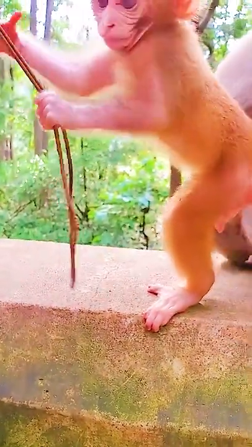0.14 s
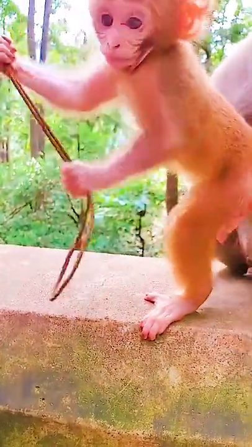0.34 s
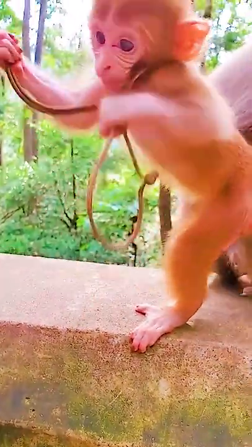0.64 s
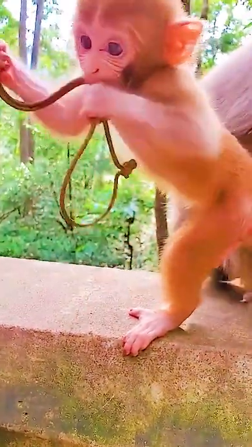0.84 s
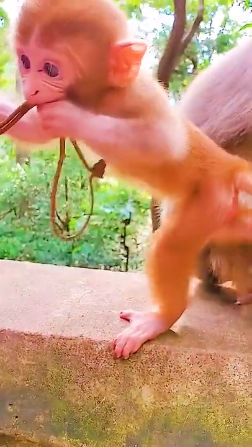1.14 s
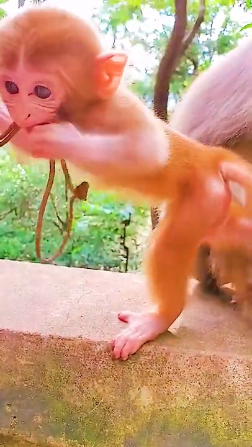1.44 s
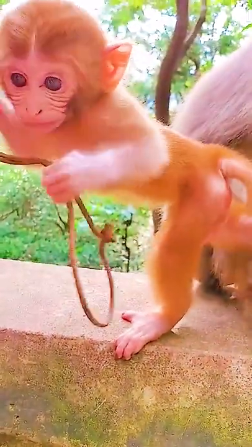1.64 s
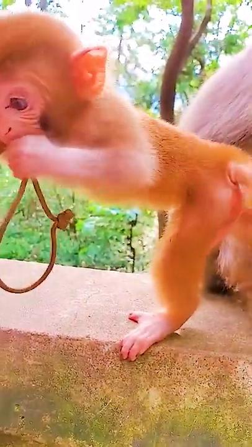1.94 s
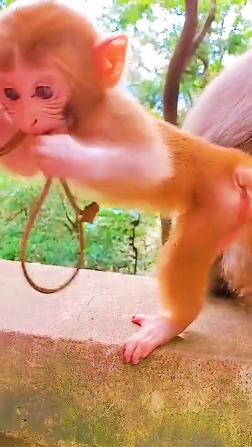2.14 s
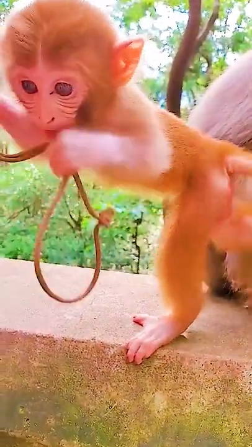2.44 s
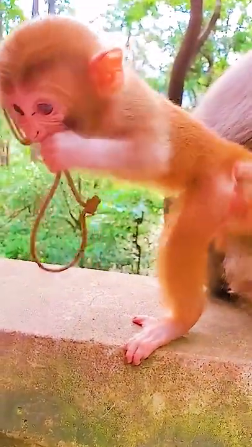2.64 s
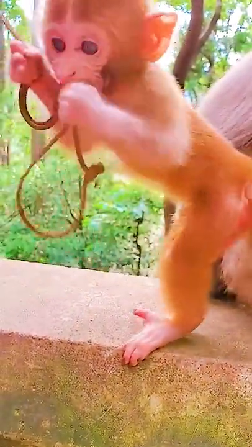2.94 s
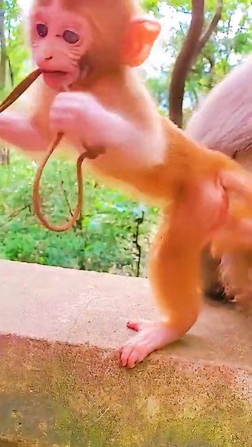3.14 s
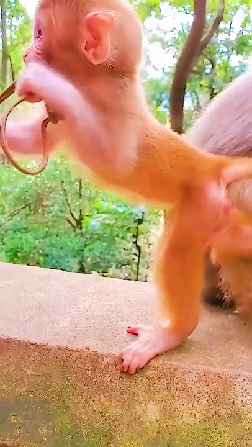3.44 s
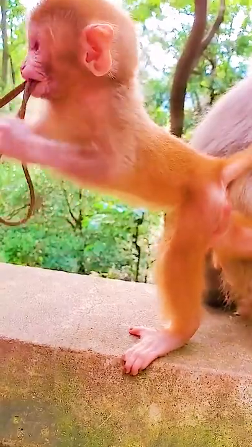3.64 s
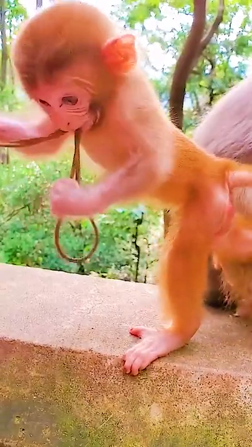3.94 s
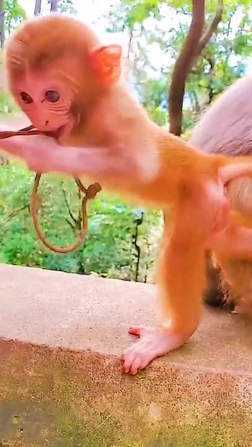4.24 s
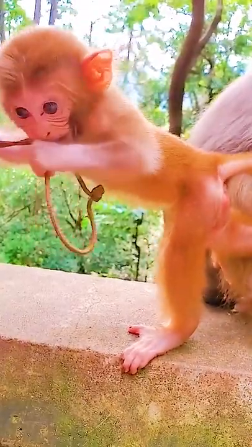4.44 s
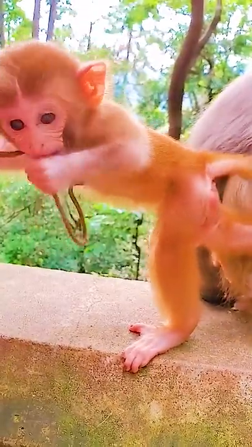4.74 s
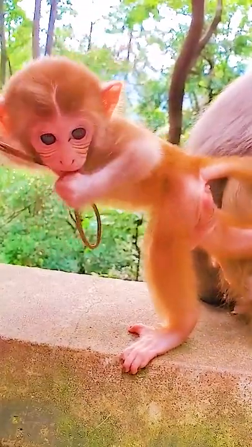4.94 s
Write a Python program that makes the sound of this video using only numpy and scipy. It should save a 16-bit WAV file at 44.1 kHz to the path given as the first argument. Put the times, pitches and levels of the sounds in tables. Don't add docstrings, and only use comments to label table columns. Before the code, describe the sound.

A young monkey shrieks four times in quick piercing bursts close on the left, then gives sparse weaker squeaks and yelps before soft coos outdoors.

```python
import sys
import numpy as np
from scipy import signal
from scipy.fft import rfft, irfft, next_fast_len
from scipy.io import wavfile
from scipy.ndimage import uniform_filter1d

SR = 44100
rng = np.random.default_rng(int(sys.argv[2]) if len(sys.argv) > 2 else 0)


def magnitude_from_level(level_db):
    exponent = np.asarray(level_db, float) / 20
    return 10 ** exponent


def master(y):
    cut = np.clip(np.atleast_2d(y).T, -1, 1)
    pcm = np.round(cut * 32767)
    wavfile.write(sys.argv[1], SR, pcm.astype(np.int16))


N = 223926

# (frequency [Hz], density [dB per Hz])
AIR_SPECTRUM = [(12, -48.5), (30, -8.5), (125, 1.5), (214, -16.5), (670, -26.5), (1150, -21.5), (3380, -28),
                (15600, -46.5)]
# (frequency [Hz], correlation [-1..1])
AIR_LIKENESS = [(25, 1), (150, 0.99), (300, 0.72), (600, 0.0324), (1650, 0.15), (5000, 0.034)]
# (frequency [Hz], level [dB])
AIR_LEAN = [(300, 0), (700, 2.5), (1650, 3.5), (5000, 9), (15000, 4)]
# (start [s], length [s], level [dB])
RUSTLES = [(0.255, 0.16, -42.5), (0.841, 0.00304, -20.5), (1.387, 0.0038, -52.5), (2.628, 0.0046, -40),
           (3.29, .003, -22.5), (1.684, 0.0022, -43.5), (2.07, 0.23, -44), (2.496, 0.008, -50),
           (2.716, 0.063, -51), (3.056, 0.0091, -55.5), (3.193, .07, -50), (3.28, 0.0023, -27.5),
           (3.616, 0.027, -50), (3.923, 0.016, -49), (4.474, .01, -61)]

# (time [s], pitch [Hz], level [dB], treble lift of the open mouth [dB])
SHRIEKS = [
    [(.405, 3700, -14, 5.5), (.41, 3880, -9.5, 8), (.422, 3900, -12, 1.5), (.439, 3575, -8, -6),
     (.445, 3090, -3, -13.5), (.453, 2690, -4.5, -20), (.459, 2530, -36, -20.5)],
    [(.577, 3445, 3, -5.5), (.59, 3956, -5, 3.5), (.62, 3783, -11, 1), (.66, 4020, -13.5, 12.5),
     (.67, 3567, -7, 3.5), (.686, 3464, -8, 6), (.694, 3210, -1, -12), (.702, 2570, -9, -15)],
    [(.845, 4080, -7, 26), (.861, 4367, -7.5, 15), (.872, 4210, -8, 9), (.877, 3403, -7, 13.5),
     (.926, 3261, -7, 15.5), (.944, 2990, 2, -6.5), (.962, 2077, -10.5, -19.5), (.972, 1870, -36, -19)],
    [(1.078, 3335, -32, 14), (1.088, 3420, -16.5, 9.5), (1.092, 3450, -2.5, -6), (1.125, 3304, -1.5, -14),
     (1.153, 3336, -2, -10), (1.159, 3426, -13.5, -9), (1.169, 3440, -19.5, -13), (1.174, 3350, -40, -20)],
]
# (time [s], pitch [Hz], level [dB], treble lift of the open mouth [dB])
YELPS = [
    [(3.084, 2176, -29.5, 0.5), (3.096, 3285, -28, 3.5), (3.108, 3600, -20.5, -14.5),
     (3.113, 3733, -16, -10.5), (3.128, 3570, -14, -7), (3.138, 2623, -21, -12.5),
     (3.148, 2140, -35.5, -37)],
    [(3.2925, 2720, -14.5, 16), (3.304, 3050, -15, 17), (3.32, 3117, -13, -0.5), (3.335, 2870, -14.5, 0.5),
     (3.346, 2795, -14, 0.5), (3.359, 2627, -17, 18), (3.364, 2450, -35.5, 2), (3.378, 2010, -39.5, -8.5)],
]
# (time [s], pitch [Hz], level [dB])
PEEPS = [
    [(.277, 3540, -30), (.287, 3545, -26.5), (.291, 3370, -18.5), (.297, 2890, -26)],
    [(1.771, 3090, -31), (1.788, 3030, -30), (1.792, 2770, -46), (1.8, 2110, -29)],
    [(1.964, 3090, -18), (1.972, 3303, -26), (1.979, 3136, -20), (1.985, 2400, -36.5), (1.994, 1970, -26)],
    [(2.16, 2414, -51.5), (2.175, 2980, -32), (2.187, 2837, -35), (2.197, 2517, -24), (2.213, 2125, -31),
     (2.222, 2010, -50)],
    [(2.43, 1454, -36), (2.437, 1510, -36), (2.444, 1340, -44)],
    [(3.539, 2463, -35), (3.546, 2660, -22.5), (3.556, 2656, -20.5), (3.561, 2153, -21), (3.568, 1696, -34),
     (3.585, 1687, -44)],
    [(3.741, 2000, -18), (3.752, 1916, -14.5), (3.762, 2008, -23), (3.78, 1654, -42)],
]
# (size factor on throat, chest [dB], second [dB], third [dB], top [dB]),
# levels against the main resonance
MOUTHS = [(0.991, -35, -1.5, 1, -7), (1.05, -44, -10, -7.5, -13.5), (0.95, -35, -9, -7.5, -9.5),
          (0.983, -4, -6.5, -3.5, -16.5), (0.96, -23, 3.5, -7, -1.5), (0.99, -43.5, -21, -0.5, -15),
          (1.2, -19, -17, -17, -10), (0.943, -21.5, 0, -3.5, 8.5), (1.013, 2, 2, -1.5, -12),
          (.9, -4, -15, -10.5, -17.5), (0.61, 9, 0, -1, 1), (0.977, 0, 3, -35, -6.5),
          (1.12, 9.5, 16.5, 1, 15.5)]
SHEEN_DB = [-1.5, -2.5, -4.5, -3, 7.5, -0.5, 6, 5.1, 4, 3.5, -3, 3.5, -17.5]
# (centre [Hz], width [Hz], level [dB])
THROAT = [(1800, 470, 1.5), (3350, 1480, 1.5), (5800, 1690, 2.5), (8180, 1520, 0.5), (10570, 2700, 0.5),
          (13300, 4500, -0.5), (13700, 780, -7)]
# (time [s], pitch [Hz], level [dB])
CLUCK = [(2.629, 954, -27.5), (2.637, 843, -29.5), (2.65, 660, -43)]
# (time [s], [(centre [Hz], width [Hz], level [dB])])
CLUCK_THROAT = [(2.63, [(816, 240, 9), (2440, 660, 2), (4500, 3300, -6), (11540, 7300, -21.5)])]
# (time [s], pitch [Hz], level [dB])
UNDERTONE = [(.586, 3582, -17), (.596, 3274, -7.5), (.608, 2907, -10.5), (.625, 2836, -16.5),
             (.64, 2890, -20.5)]
# (time [s], [(centre [Hz], width [Hz], level [dB])])
UNDERTONE_THROAT = [(.6, [(3105, 1200, 0.5), (5700, 1700, -3.5), (8700, 1500, -15)])]
# (start [s], length [s], depth [dB])
STUTTERS = [
    (.425, .03, 1.5),
    (.93, .035, 3),
    (1.076, .1, 2.5),
]
# (start [s], length [s], chaos [0-1], share of lines between harmonics [0-1])
STRAIN = [(.293, .008, .5, .1), (.4, .025, .45, 1.1), (.422, .02, .65, .2), (.44, .025, .4, .04),
          (.587, .07, .55, .15), (.664, .03, .26, .6), (.69, .02, .3, .05), (.874, .056, .82, .3),
          (.93, .045, .33, .03), (1.07, .11, .63, .1), (1.794, .01, .45, .15), (1.96, .022, .15, .6),
          (2.425, .024, .4, .15), (2.62, .035, .4, .13), (3.113, .04, .6, .5), (3.302, .04, .17, .5),
          (1.982, .02, .55, .2), (2.155, .07, .14, .1), (3.364, .02, .7, .1), (3.564, .025, .9, .4),
          (3.735, .05, .7, .2), (4.51, .12, .15, .12), (4.632, .04, .35, .45), (4.67, .05, .25, .3),
          (4.914, .056, .62, 1.1)]

# (time [s], pitch [Hz], level [dB])
SQUEALS = [
    [(2.03, 4750, -61), (2.13, 4390, -46.5), (2.22, 3836, -44), (2.3, 3470, -44), (2.375, 2840, -52)],
    [(3.676, 4420, -32.5), (3.7, 3700, -55), (3.75, 3308, -44.5), (3.85, 2970, -38.5), (3.95, 2723, -43),
     (4.09, 2125, -48.5)],
    [(3.92, 2400, -70), (3.98, 1965, -40), (4.07, 1430, -54.5), (4.12, 1270, -71)],
]
# (start [s], length [s], pitch [Hz], end pitch [Hz], level [dB])
WHISTLES = [(0.3, 0.089, 3120, 3108, -52), (0.485, 0.052, 265, 318, -43.5), (0.71, 0.16, 1500, 1495, -64.5),
            (1.019, 0.038, 1400, 1370, -56.5), (1.281, 0.29, 1070, 1043, -60.5),
            (2.717, 0.08, 2057, 2050, -63), (3.38, 0.16, 2915, 2800, -58.5), (.33, .075, 5700, 5200, -58.5),
            (.36, .035, 8020, 7600, -62), (3.618, 0.064, 3520, 3480, -60.5),
            (3.816, 0.107, 5330, 5510, -72), (3.926, 0.014, 690, 680, -51.5),
            (4.004, 0.25, 1092, 1020, -63), (4.142, 0.28, 1059, 1042, -62.5)]

# (time [s], pitch [Hz], level [dB])
COO_HIGH = [(4.518, 593, -45.5), (4.57, 678, -32.5), (4.632, 689, -37), (4.637, 708, -30.5),
            (4.76, 721.5, -29), (4.78, 750, -30), (4.895, 832, -25.5), (4.96, 767, -25.5),
            (4.988, 674, -30.5)]
# (time [s], pitch [Hz], level [dB])
COO_LOW = [(4.692, 530.5, -43), (4.728, 622, -32.5), (4.814, 645.3, -34.5), (4.99, 672, -33.5),
           (5.032, 637.5, -34), (5.056, 575, -40.5)]
# (time [s], [(centre [Hz], width [Hz], level [dB])])
HIGH_THROAT = [
    (4.62, [(715, 650, 5), (2010, 600, -3), (3350, 1400, -10.5), (5100, 320, -2.5), (8900, 1300, -7)]),
    (4.645, [(770, 117, 11), (1340, 270, 6), (2000, 900, -1.5), (7400, 460, -3), (9400, 700, -5.5)]),
    (4.87, [(880, 160, 2.5), (1410, 1260, -5), (2010, 640, -12.5), (5780, 510, -17), (9100, 1200, -21)]),
]
# (time [s], [(centre [Hz], width [Hz], level [dB])])
LOW_THROAT = [
    (4.72, [(600, 600, 10), (2500, 800, 5), (3500, 2100, 4), (5800, 1600, -4), (9390, 2100, 10)]),
    (5.02, [(650, 1110, -1), (2820, 460, 3), (4300, 1300, 2.5), (8000, 3300, -12.5), (11300, 2100, -10)]),
]

# (frequency [Hz], t60 [s])
WOOD_T60 = [(500, 0.12), (1500, 1.13), (3200, 0.91), (6000, 1.11), (12000, 0.86)]
# (frequency [Hz], loss [dB])
CALL_SHADOW = [(300, 6.5), (700, 23), (1300, 2.5), (2400, 11), (4400, 14.5), (8000, 22), (15000, 31)]
# (frequency [Hz], loss [dB])
COO_SHADOW = [(380, 0), (700, 18), (1300, 2), (2400, 11.5), (4400, 15.5), (8100, 21), (15000, 45)]

AIR_DB = -43.5
RUSTLE_LOW_HZ, RUSTLE_TOP_HZ = 5140, 14970
GAPE_OPEN_DB, GAPE_SHUT_DB = 13.5, -18
STUTTER_HZ = 170
STRAIN_EDGE_S, CALM_CHAOS, CALM_LINES = 0.017, 0.035, 0.0349
HOOT_OVERTONE_DB = -13
EDGE_HZ = 15800


def evened(x):
    return x / np.sqrt(np.mean(abs(x) ** 2) + 1e-20)


def read(points, hz):
    f, value = np.transpose(points)
    return np.interp(np.log(hz + 1), np.log(f + 1), value)


def add(mix, start_s, sound):
    part = mix[round(start_s * SR):][:len(sound)]
    part += sound[:len(part)]


def wander(shape, hz):
    noise = rng.standard_normal(shape)
    return evened(signal.lfilter(*signal.butter(3, hz, fs=SR), noise))


def coloured(x, points_db, sign=1):
    size = next_fast_len(N)
    gain = magnitude_from_level(sign * read(points_db, np.fft.rfftfreq(size, 1 / SR)))
    return irfft(rfft(x, size) * gain, size)[..., :N]


def air():
    frames, hz = N // 512 + 5, np.fft.rfftfreq(2048, 1 / SR)
    a, b, c, d, patches = rng.standard_normal((frames, 1025, 5)).T
    patches_db = evened(uniform_filter1d(uniform_filter1d(patches, 30, 0), 8, 1))
    same = np.clip(read(AIR_LIKENESS, hz), -1, 1)[:, None]
    lean = magnitude_from_level(read(AIR_LEAN, hz) / 2)[:, None]
    left = a + 1j * b
    right = same * left + np.sqrt(1 - same ** 2) * (c + 1j * d)
    z = np.array([left * lean, right / lean])
    z *= magnitude_from_level(read(AIR_SPECTRUM, hz)[:, None] + patches_db)
    return magnitude_from_level(AIR_DB) * evened(signal.istft(z, nperseg=2048, noverlap=1536)[1][:, :N])


def rustles():
    out = np.zeros(N)
    for start_s, length_s, db in RUSTLES:
        size = round(length_s * SR)
        grain = magnitude_from_level(db + 2.25 * wander(size, 300)) * rng.standard_normal(size)
        add(out, start_s, grain * signal.windows.tukey(size, .5))
    band = signal.butter(2, [RUSTLE_LOW_HZ, RUSTLE_TOP_HZ], "band", fs=SR, output="sos")
    return signal.sosfilt(band, out)


def strain(t):
    s, length, chaos, lines = np.transpose(STRAIN)[..., None]
    on = np.clip(np.minimum(t - s, s + length - t) / STRAIN_EDGE_S + .5, 0, 1)
    return np.maximum((on * chaos).max(0), CALM_CHAOS), np.maximum((on * lines).max(0), CALM_LINES)


def throat_gain(shapes, t, f):
    grid_hz, out = np.arange(0, 30000, 25.), 0
    times = [s for s, _ in shapes]
    for pick, (_, modes) in zip(np.eye(len(shapes)), shapes):
        power = sum(magnitude_from_level(2 * db) / (1 + (2 * (grid_hz - hz) / width) ** 2) ** 2.26 for hz, width, db in modes)
        out = out + np.interp(t, times, pick) * np.interp(f, grid_hz, np.sqrt(power))
    return out


def voice(rows, shapes, count, order, low_hz, top_hz, smear_hz, flutter_db, patchy_db, jitter, strained=True):
    s, *columns = np.transpose(rows)
    t = np.arange(s[0], s[-1], 1 / SR)
    hz, level_db, *gape = (np.interp(t, s, c) for c in columns)
    lift_db = sum(gape)
    chaos, under = strain(t) if strained else (CALM_CHAOS, 0)
    turns = np.cumsum(hz * (1 + jitter * wander(len(t), 93.4))) / SR / count
    k = np.arange(1, int(top_hz * count / hz.min()) + 1)[:, None]
    f = k * hz / count
    gain = throat_gain(shapes, t, f) * magnitude_from_level(lift_db / (1 + (4800 / f) ** 8))
    gain = gain / (1 + (f / top_hz) ** 20 + (low_hz / f) ** 5)

    loose = 1 - (1 - np.clip(chaos, 0, .99)) ** ((f / np.clip(hz, 2300, 3600)) ** 1.15)
    held = 1 - loose
    loose = loose * np.where(k % count, .55, 1)
    between = np.clip(under, 0, 2) * (k % order == 0) * (k > count)
    steady = held * np.where(k % count, between, 1)
    shake = wander(f.shape, smear_hz) + 1j * wander(f.shape, smear_hz)
    weight = gain * (steady + loose * shake / np.sqrt(count))
    weight *= magnitude_from_level(patchy_db * np.clip(f / 7000, 0.17 + chaos, 1.4) * wander(f.shape, 33.2))

    sound = (weight * np.exp(2j * np.pi * (k * turns + rng.random(k.shape)))).real.sum(0)
    power = (gain ** 2 * (steady ** 2 + 2 * loose ** 2 / count)).sum(0) / 2
    gasp = magnitude_from_level(flutter_db * np.clip(chaos, 0, 1) * wander(len(t), 515))
    edge = np.clip(np.minimum(t - s[0], 0.5 * (s[-1] - t)) / 0.0014, 0, 1)
    return s[0], sound / np.sqrt(power) * magnitude_from_level(level_db) * gasp * edge


def closing(rows):
    times = [row[0] for row in rows]
    gape_db = np.interp(times, [times[0], times[-1]], [GAPE_OPEN_DB, GAPE_SHUT_DB])
    return np.column_stack([rows, gape_db])


def chirps():
    out = np.zeros(N)
    calls = SHRIEKS + YELPS + [closing(rows) for rows in PEEPS]
    for rows, (mouth, chest_db, second_db, third_db, top_db), sheen_db in zip(calls, MOUTHS, SHEEN_DB):
        levels = [chest_db, 0, second_db, third_db, top_db, top_db + sheen_db, top_db + sheen_db]
        modes = [(hz * mouth, width, db + level) for (hz, width, db), level in zip(THROAT, levels)]
        add(out, *voice(rows, [(0, modes)], count=4, order=2, low_hz=1414, top_hz=15800,
                        smear_hz=372, flutter_db=-2.0, patchy_db=3.0, jitter=0.01))
    add(out, *voice(CLUCK, CLUCK_THROAT, count=2, order=1, low_hz=503, top_hz=15500,
                    smear_hz=400, flutter_db=2.0, patchy_db=1.5, jitter=0.04))
    add(out, *voice(UNDERTONE, UNDERTONE_THROAT, count=1, order=1, low_hz=1400, top_hz=12000,
                    smear_hz=298, flutter_db=-11.5, patchy_db=-3.0, jitter=0.0119))
    depth_db = np.zeros(N)
    for start_s, length_s, db in STUTTERS:
        add(depth_db, start_s, db * signal.windows.tukey(round(length_s * SR), .3))
    return out * magnitude_from_level(depth_db * np.clip(wander(N, STUTTER_HZ) - .5, -3, 1))


def far_whistles():
    out = np.zeros(N)
    for start_s, length_s, hz, end_hz, db in WHISTLES:
        size = round(length_s * SR)
        glide_hz = np.linspace(hz, end_hz, size) * (1 + 0.006 * wander(size, 80))
        turn = 2 * np.pi * np.cumsum(glide_hz) / SR
        overtones = (np.sin(2 * turn) + np.sin(3 * turn)) * (900 < hz < 1600)
        tone = np.sin(turn) + magnitude_from_level(HOOT_OVERTONE_DB) * overtones
        level = magnitude_from_level(db + 3.0 * wander(size, 25)) * signal.windows.tukey(size, .4)
        add(out, start_s, np.sqrt(2) * tone * level)
    return out


def far_squeals():
    out = np.zeros(N)
    for rows in SQUEALS:
        s, hz, db = np.transpose(rows)
        t = np.arange(s[0], s[-1], 1 / SR)
        glide_hz = np.interp(t, s, hz) * (1 + 0.00372 * wander(len(t), 70))
        tone = np.sin(2 * np.pi * np.cumsum(glide_hz) / SR)
        level = magnitude_from_level(np.interp(t, s, db)) * signal.windows.tukey(len(t), .03)
        add(out, s[0], np.sqrt(2) * tone * level)
    return out


def coos():
    out = np.zeros(N)
    add(out, *voice(COO_HIGH, HIGH_THROAT, count=3, order=1, low_hz=630, top_hz=11900,
                    smear_hz=110, flutter_db=0.5, patchy_db=2.5, jitter=0.008))
    add(out, *voice(COO_LOW, LOW_THROAT, count=1, order=1, low_hz=439, top_hz=15100,
                    smear_hz=200, flutter_db=18.0, patchy_db=3.5, jitter=0.0058, strained=False))
    return out


def wood(x, stretch, onset_s):
    taps = np.zeros((2, SR))
    at = np.arange(100, SR - 20, 20) + rng.integers(0, 20, (2, (SR - 101) // 20))
    np.put_along_axis(taps, at, rng.choice([-1., 1.], at.shape), 1)
    hz, t, z = signal.stft(taps, SR, nperseg=256)
    t60_s = stretch * read(WOOD_T60, hz)[:, None]
    z = z * magnitude_from_level(-60 * t / t60_s) * np.clip(t / onset_s, 0, 1)
    tail = signal.istft(z, SR, nperseg=256)[1]
    return signal.fftconvolve(x[None], tail / np.linalg.norm(tail[0]), axes=1)[:, :N]


def ports(x, shadow, late, scatter):
    paths = np.zeros(900)
    paths[late + np.array([0, 23, 61, 110, 190, 330])] = 1, -scatter, scatter, scatter, -scatter, scatter
    right = signal.oaconvolve(coloured(x, shadow, -1), paths / np.linalg.norm(paths))[:N]
    return np.array([x, right])


def scene():
    near, soft = chirps(), coos()
    whistles, squeals = far_whistles(), far_squeals()
    echo_send = magnitude_from_level(np.interp(np.arange(N) / SR, [1.3, 1.6], [0, -9]))
    echo = magnitude_from_level([[-23], [-33]]) * wood(near * echo_send + soft, 0.59, 0.00373)
    bright = signal.sosfilt(signal.butter(2, 4500, "high", fs=SR, output="sos"), near * echo_send)
    echo += magnitude_from_level(-22) * magnitude_from_level([[0], [-22]]) * wood(bright, 0.4, 0.0027)
    far = magnitude_from_level(-5.5) * squeals + magnitude_from_level(3.0) * wood(squeals, 1.0, 0.014)
    far = far + whistles + magnitude_from_level(6.5) * wood(whistles, 0.8, .01)
    direct = ports(near + rustles(), CALL_SHADOW, 20, 1.0) + ports(soft, COO_SHADOW, 2, 0.017)
    return direct + echo + far * magnitude_from_level([[3], [-4]]) + air()


def band_limit(x):
    return signal.sosfilt(signal.butter(12, 15790, fs=SR, output="sos"), x)


def record(dry):
    power_db = 10 * np.log10(abs(uniform_filter1d((dry ** 2).max(0), 300)) + 1e-12)
    fall_db = np.arange(N) * 56.0 / SR
    over_db = np.maximum(np.maximum.accumulate(power_db + fall_db) - fall_db + 11.5, 0)
    ducked = dry / magnitude_from_level(0.37 * uniform_filter1d(over_db, 150))
    peak_db = 10 * np.log10(abs(uniform_filter1d((ducked ** 2).max(0), 90)) + 1e-12)
    flattened = ducked / magnitude_from_level(0.27 * np.maximum(peak_db + 12, 0))
    high_pass = signal.butter(1, 250, "high", fs=SR, output="sos")
    lopsided = signal.sosfilt(high_pass, flattened ** 2 * abs(flattened))
    bent = 1.174 * flattened + 0.13 * lopsided
    low_pass = signal.firwin(511, EDGE_HZ, window=("kaiser", 9), fs=SR)
    limited = signal.oaconvolve(bent, low_pass[None], "same")
    return band_limit(np.clip(limited, -1, 1))


dry = scene()
out = record(dry)
master(out)
```